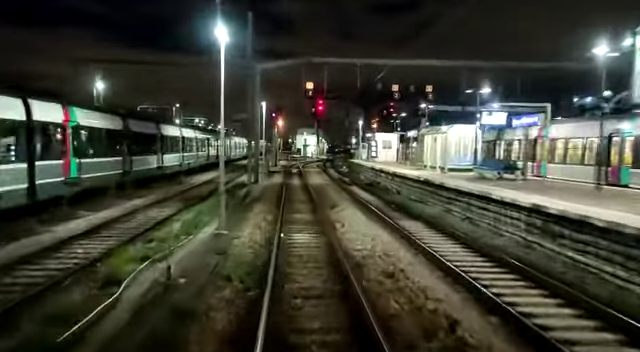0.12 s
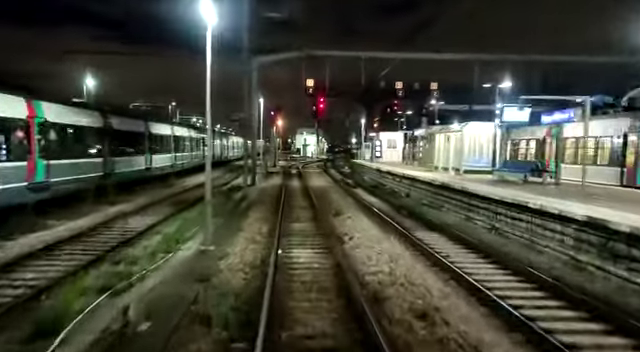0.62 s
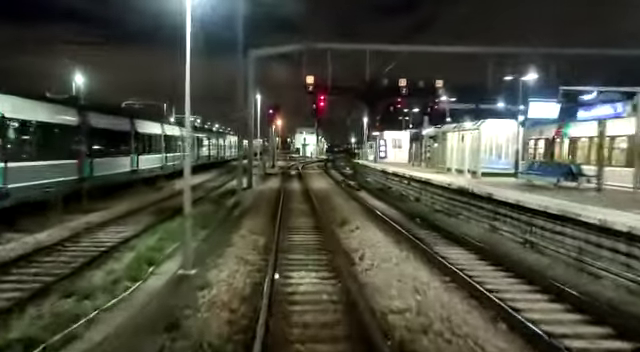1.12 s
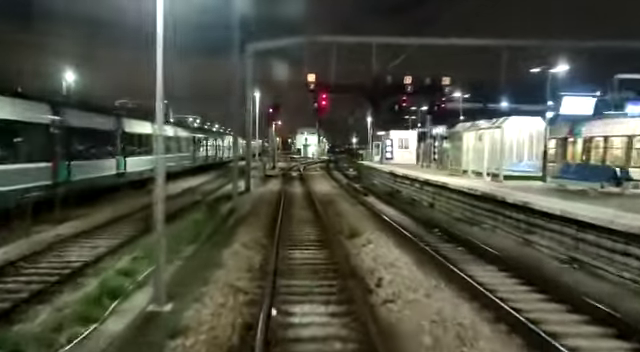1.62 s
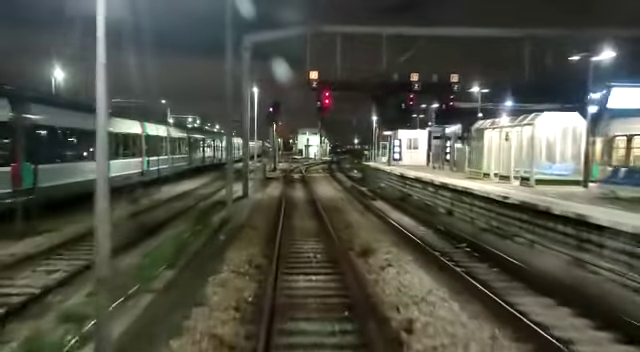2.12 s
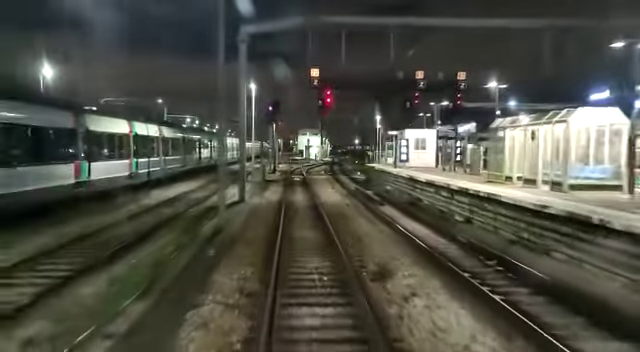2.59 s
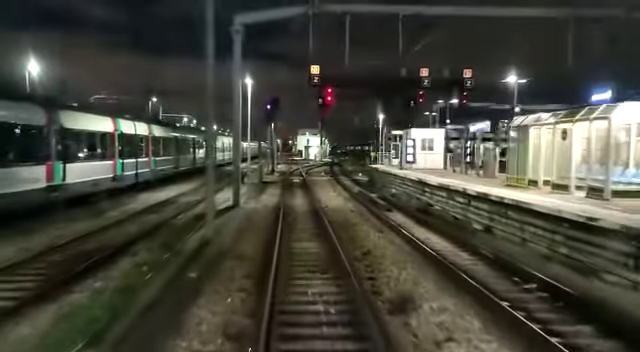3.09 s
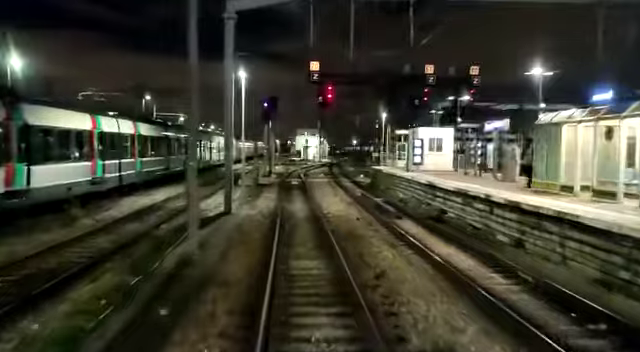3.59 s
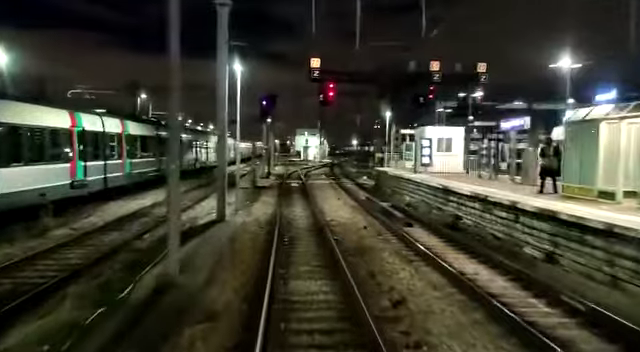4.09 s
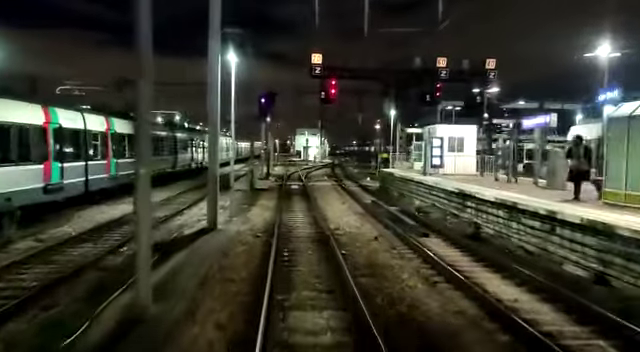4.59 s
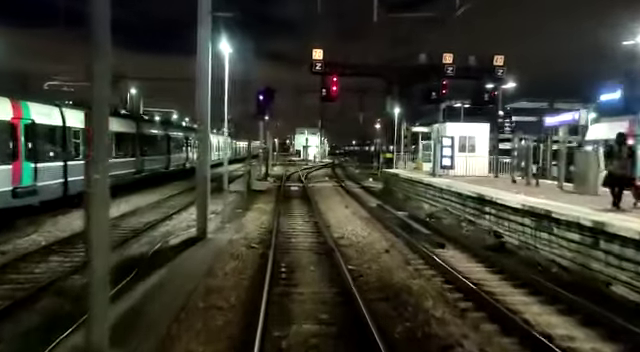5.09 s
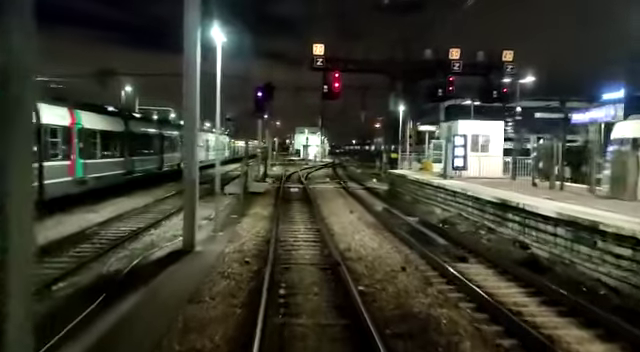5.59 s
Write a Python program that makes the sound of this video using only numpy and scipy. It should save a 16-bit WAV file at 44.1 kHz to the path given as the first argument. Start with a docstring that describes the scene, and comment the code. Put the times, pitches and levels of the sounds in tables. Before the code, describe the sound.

Inside an electric train cab rolling slowly: deep steady floor rumble, irregular dull wheel knocks over rail joints, short air-valve hisses and faint whine.

```python
"""A deep floor rumble and a knock of the wheels come first: we sit in the cab of an electric train
rolling slowly through a station at night. Rumble and air are coloured noise; knocks ring the floor's tones.
Air valves, small spits and rattles are short noise bursts; rubber squeaks are throbbing tones.
A fan hums and two power converters whine as wavering sines. The right microphone port is the brighter."""
import sys
import numpy as np
from scipy import signal
from scipy.fft import rfft, irfft, next_fast_len
from scipy.io import wavfile
from scipy.ndimage import uniform_filter1d

SR = 44100
rng = np.random.default_rng(int(sys.argv[2]) if len(sys.argv) > 2 else 0)


def wav_out(sig):
    """Save sig, one row per channel (or a flat mono array), as 16-bit PCM at SR to the path in sys.argv[1]."""
    wavfile.write(sys.argv[1], SR, np.round(np.clip(np.atleast_2d(sig).T, -1, 1) * 32767).astype(np.int16))


def decibels_to_gain(level_db):
    """Convert a level in decibels to a linear amplitude gain (20 dB per decade)."""
    exponent = np.asarray(level_db, float) / 20
    return 10 ** exponent


N = 251355  # length in samples, 5.7 s


def read(points, hz):
    """Reads a table of (frequency, value) between its points, on a log-frequency axis."""
    point_hz, value = np.transpose(points)
    return np.interp(np.log(hz + 1), np.log(point_hz + 1), value)


def along(rows):
    """Draws a level curve from (time, dB) points, one value per sample."""
    return np.interp(np.arange(N) / SR, *np.transpose(rows))


def add(mix, start_s, sound):
    """Mixes a stereo sound in at a given time, cutting off what runs past the end."""
    part = mix[:, max(round(start_s * SR), 0):][:, :sound.shape[1]]
    part += sound[:, :part.shape[1]]


def bump(hz, centre_hz, width_hz, peak_db):
    """A resonance lifts the frequencies around its centre; gives the lift in dB."""
    return peak_db / (1 + (2 * (hz - centre_hz) / width_hz) ** 2)


def split_db(hz, sign):
    """Gain in dB that keeps what lies above 4000 Hz (sign > 0) or below it (sign < 0); a small sign is gentler."""
    return -10 * np.log10(1 + ((hz + 1) / 4000) ** (-4 * sign))


def peaked(sound, level_db):
    """Sets the loudest 10 ms of the centre (mean of both ports) to the level of a sine that peaks at level_db."""
    loudest_power = uniform_filter1d(sound.mean(0) ** 2, SR // 100).max()
    return sound * decibels_to_gain(level_db) / np.sqrt(2 * loudest_power)


def slow(top_hz, channels):
    """Slow chance: 16 sines of random phase up to top_hz, the slower the stronger, scaled to rms 1."""
    hz = np.geomspace(top_hz / 20, top_hz, 16)[:, None]
    coarse_s = np.arange(0, N + 64, 64) / SR  # one point per 64 samples is enough
    curves = []
    for _ in range(channels):
        sines = np.sin(2 * np.pi * (hz * coarse_s + rng.random(hz.shape)))
        curve = (sines / np.sqrt(hz)).sum(0)
        curves.append(np.interp(np.arange(N) / SR, coarse_s, curve / curve.std()))
    return np.array(curves)


def diffuse(colour_db, size):
    """Noise that fills the cab: alike at both ports in the bass, nearly unrelated in the treble; centre rms 1."""
    # likeness of the two ports: pitch_hz, likeness (1 same, 0 unrelated, below 0 opposed)
    likeness = [(60, .99), (300, .95), (500, .75), (800, .5), (1200, -.1), (2500, -.2), (6000, -.05),
                (14000, .03)]
    # balance of the two ports: pitch_hz, left_over_right_db
    balance = [(60, -0.2), (700, 1.5), (1300, -7.5), (2200, -10), (3200, -5), (4700, -9), (6800, -8.5),
               (10500, -14.5), (12000, -9.5), (14000, -3.5)]
    hz = np.fft.rfftfreq(size, 1 / SR)
    a, b = rfft(rng.standard_normal((2, size)))
    same = np.clip(read(likeness, hz), -1, 1)
    side_gain = decibels_to_gain(read(balance, hz) / 2)
    left = a * side_gain
    right = (same * a + np.sqrt(1 - same ** 2) * b) / side_gain
    noise = irfft(np.array([left, right]) * decibels_to_gain(colour_db(hz)), size)
    return noise / noise.mean(0).std()


def patchy(sound, spread_db, bins, frames):
    """Patches of the spectrum, bins (86 Hz) by frames (2.9 ms) in size, swell and fade by chance."""
    spectrum = signal.stft(sound, nperseg=512, noverlap=384)[2]
    field = rng.standard_normal(spectrum.shape[1:])
    field = uniform_filter1d(uniform_filter1d(field, bins, 0), frames, 1)
    gain = decibels_to_gain(spread_db * field / field.std())
    return signal.istft(spectrum * gain, nperseg=512, noverlap=384)[1][:, :N]


def rolling():
    """Rough rail shakes the car body; air rushes in the vents and fizzes at the seals."""
    # spectrum of the rumble: pitch_hz, relative_level_db (per Hz)
    rumble_colour = [(8.8, 5), (15, -1.5), (38, 0), (65, -3), (109, -7.5), (199, -16), (243, -17.5),
                     (566, -32), (832, -36.5), (1200, -56), (1560, -44), (2640, -120)]
    # booms of the car body: pitch_hz, width_hz, lift_db
    booms = [(56.6, 3.8, -0.5), (104, 12, 5), (154, 77, 1.5), (252, 25, 4), (331, 42, 5.5)]
    # spectrum of the air: pitch_hz, relative_level_db (per Hz)
    air_colour = [(350, -23), (600, -8), (1100, -4.5), (1800, -7.5), (4000, -14), (5500, -22.5),
                  (7500, -23), (8200, -20), (8500, -113), (9400, -27), (10200, -36.5), (14400, -39)]
    # rumble as the track roughens and smooths: time_s, level_db
    rumble_curve = [(0.0, -34.5), (0.7, -35), (0.95, -32.5), (1.45, -32), (1.8, -35), (3.2, -36.5),
                    (3.6, -33), (4.2, -33.5), (4.55, -36), (4.75, -32.5), (5.7, -33.5)]
    # mid-band rush of air: time_s, level_db
    rush_curve = [(0.0, -56), (0.4, -59), (0.95, -60.5), (1.4, -55.5), (1.8, -59), (3.3, -60), (3.62, -56),
                  (3.9, -61), (5.7, -60)]
    # treble fizz of air: time_s, level_db
    fizz_curve = [(0.0, -63), (0.3, -67), (1.0, -65), (1.4, -65), (1.75, -67.5), (3.3, -66.5), (3.65, -64),
                  (3.95, -62), (4.15, -58), (4.55, -60.5), (4.8, -62.5), (5.0, -66), (5.3, -61.5),
                  (5.55, -67), (5.7, -65.5)]
    size = next_fast_len(N)
    rumble = diffuse(lambda hz: read(rumble_colour, hz) + sum(bump(hz, *boom) for boom in booms), size)
    rumble = patchy(rumble, spread_db=1.98, bins=3, frames=20)
    rush = diffuse(lambda hz: read(air_colour, hz) + split_db(hz, -1), size)[:, :N]
    fizz = diffuse(lambda hz: read(air_colour, hz) + split_db(hz, 1), size)[:, :N]
    air = decibels_to_gain(along(rush_curve)) * rush + decibels_to_gain(along(fizz_curve)) * fizz
    return decibels_to_gain(along(rumble_curve)) * rumble + patchy(air, spread_db=1.06, bins=30, frames=16)


def machine_tone(hz, level_db, lean_db, waver_db, drift_turns, waver_hz):
    """A steady machine tone; reflections make it waver differently at each port."""
    turns = hz * np.arange(N) / SR + drift_turns * slow(waver_hz, channels=2)
    sides_db = lean_db * np.array([[.5], [-.5]]) + waver_db * slow(waver_hz, channels=2)
    return np.sqrt(2) * decibels_to_gain(level_db + sides_db) * np.sin(2 * np.pi * turns)  # level_db is an rms level


def machines():
    """The fan's blade tone and the second and third harmonics of both converters' switching."""
    out = machine_tone(853.5, -63.5, lean_db=-.3, waver_db=2.6, drift_turns=.13, waver_hz=40)  # fan
    # converters: switching_hz, second harmonic level_db, third_over_second_db
    for switching_hz, level_db, third_db in ((3978.2, -65.5, -18), (4064.6, -64, -26)):
        out += machine_tone(2 * switching_hz, level_db,
                            lean_db=-1.2, waver_db=.9, drift_turns=.03, waver_hz=5)
        out += machine_tone(3 * switching_hz, level_db + third_db,
                            lean_db=-3.0, waver_db=2.5, drift_turns=.05, waver_hz=6)
    return out


def spits():
    """Small leaks let out thin, soft-edged bursts of mostly treble noise."""
    # leaks: start_s, peak_level_db
    leaks = [(0.106, -53.5), (0.191, -66), (1.02, -64), (2.804, -56), (3.503, -60.5), (3.653, -59),
             (3.774, -52.5)]
    # spectrum of a leak: pitch_hz, relative_level_db (per Hz)
    leak_colour = [(3500, -16), (5500, 11), (7500, 14.5), (9000, -1), (11500, 0), (14400, 12.5)]
    out, t = np.zeros((2, N)), np.arange(SR // 5) / SR
    rise_s, fade_s = .004, .032
    shape = (1 - np.exp(-t / rise_s)) * np.exp(-(t / fade_s) ** 2)
    for start_s, level_db in leaks:
        air = diffuse(lambda hz: read(leak_colour, hz), len(t))
        add(out, start_s, peaked(air * shape, level_db))
    return out


def squeaks():
    """Rubber sticks and slips on metal: brief throbbing tones from the right."""
    # squeaks: start_s, length_s, level_db (before the side balance), pitch_hz
    rubs = [(4.693, .07, -57, 3175), (5.068, .025, -60, 2650), (5.096, .086, -51, 2575),
            (5.2, .04, -61, 2600), (5.215, .05, -59, 2200)]
    slips_per_s, slip_depth = 48, .7
    grows_db, climb = 4, .007  # gain in level; pitch goes from 0.7 % below to 0.7 % above
    sides_db = np.array([[-2], [7]])  # left, right
    out = np.zeros((2, N))
    for start_s, length_s, level_db, pitch_hz in rubs:
        t = np.arange(int(length_s * SR)) / SR
        turns = np.cumsum(pitch_hz * (1 + climb * (2 * t / length_s - 1))) / SR
        wobble = .3 * np.sin(2 * np.pi * (30 * t + rng.random((2, 1))))  # in radians, 30 times a second
        tone = np.sin(2 * np.pi * (turns + rng.random((2, 1))) + wobble)
        slips = 1 - slip_depth * np.cos(np.pi * slips_per_s * t) ** 2
        swell = signal.windows.tukey(len(t), .3) * decibels_to_gain(grows_db * (t / length_s - 1))
        add(out, start_s, decibels_to_gain(level_db + sides_db) * tone * slips * swell)
    return out


def puffs_and_rattles():
    """Short bursts of hiss: the loud ones are air valves, the duller ones probably rattles after the knocks;
    each dies away in the cab, treble first."""
    # bursts of hiss, from loud valves or rattles: start_s, roar_peak_db, fizz_peak_db, hold_s
    # (peaks before the patches)
    bursts = [(0.474, -47, -50.5, 0.024), (0.825, -43, -35.5, 0.043), (1.137, -52, -67, 0.019),
              (1.233, -47.5, -60, 0.018), (1.308, -43, -73, 0.041), (1.396, -48, -76, 0.023),
              (1.581, -51.5, -71, 0.035), (2.802, -56, -60, 0.036), (4.496, -52.5, -58, 0.049),
              (4.688, -51.5, -67, 0.053), (5.063, -50, -58, 0.055), (5.315, -50, -66, 0.09)]
    # spectrum of the bursts: pitch_hz, relative_level_db (per Hz)
    burst_colour = [(300, -17), (500, 4.5), (1400, 6.5), (2700, 4), (4200, -9), (7700, -11.5),
                    (10600, -23.5), (11700, -34), (13200, -20), (14400, -46)]
    # resonances of the bursts: pitch_hz, width_hz, lift_db
    resonances = [(1375, 16, 6.5), (2170, 430, 0.5), (3400, 190, 5), (5270, 620, 8), (6480, 940, 7),
                  (10800, 1600, 9)]
    roar_t60_s, fizz_t60_s = .26, .21  # time to die away by 60 dB
    out, t = np.zeros((2, N)), np.arange(SR // 3) / SR

    def colour(hz):
        return read(burst_colour, hz) + sum(bump(hz, *mode) for mode in resonances)

    for start_s, roar_db, fizz_db, hold_s in bursts:
        rise_s = .13 * hold_s
        flutter = uniform_filter1d(rng.standard_normal(len(t)), 130)
        onset = (1 - np.exp(-t / rise_s)) * decibels_to_gain(1.5 * flutter / flutter.std())
        for sign, level_db, t60_s in ((-.79, roar_db, roar_t60_s), (.8, fizz_db, fizz_t60_s)):
            hiss = diffuse(lambda hz: colour(hz) + split_db(hz, sign), len(t))
            ring_out = decibels_to_gain(-60 * np.maximum(t - hold_s, 0) / t60_s)
            add(out, start_s - .003, peaked(hiss * onset * ring_out, level_db))
    return patchy(out, spread_db=3.0, bins=4, frames=14)  # uneven bands from the cab's reflections


def knocks():
    """Wheels cross rail joints: a rough contact rings the floor, and each blow lands elsewhere."""
    # blows: start_s, peak_level_db (floor tones from 200 Hz up), thump_over_peak_db (tones below 200 Hz)
    blows = [(0.009, -34.5, -0.5), (0.214, -44, 12), (0.845, -32, 3.5), (0.9, -39.5, 3), (1.117, -37, -2),
             (1.322, -28.5, -1), (2.786, -38, 1), (3.021, -37.5, 4), (3.239, -40.5, 12), (3.472, -39, -2),
             (3.53, -37, -13), (4.25, -43, 13), (4.655, -37, 7), (4.7, -34, 7), (4.868, -38, 2),
             (5.343, -32, 6.5), (5.452, -33.5, -11), (5.552, -31.5, -19)]
    # what the floor rings with: pitch_hz, relative_level_db, t60_s (time to die away by 60 dB)
    floor_modes = [(48.1, 16.5, 0.54), (99.4, 14, 0.83), (174, 11, 0.29), (252, 7.5, 0.052),
                   (308.5, 7.5, 0.09), (426.5, 7.5, 0.057), (509.7, -1, 0.13), (611, -9.5, 0.1),
                   (680.3, -2, 0.31), (826, -3.5, 0.26), (1060, -20, 0.16), (1200, -24, 0.24),
                   (1733, -8, 0.66), (2100, -12, 0.085)]
    out, t = np.zeros((2, N)), np.arange(SR // 3) / SR
    # every mode becomes three close neighbours
    hz, db, t60_s = np.repeat(np.transpose(floor_modes), 3, axis=1)[:, :, None]
    low = hz[:, 0] < 200
    rise_s, contact_s = .002, .062
    force = (1 - np.exp(-t / rise_s)) * np.exp(-(t / contact_s) ** 1.7)
    force *= 1 + .8 * np.exp(-t / .005)  # the first impact is the hardest
    for start_s, level_db, thump_db in blows:
        spread = 1 + .0407 * rng.standard_normal(hz.shape)
        rings = decibels_to_gain(db - 60 * t / t60_s) * np.sin(2 * np.pi * hz * spread * t) / np.sqrt(t60_s)
        push = diffuse(lambda f: 0 * f, len(t)) * force  # noise: the rough contact
        for part, part_db in ((low, thump_db), (~low, 0)):
            rung = signal.fftconvolve(push, rings[part].sum(0)[None], axes=1)
            add(out, start_s - .002, peaked(rung, level_db + part_db))
    return out


def scene():
    """All sources at the microphone ports."""
    return rolling() + machines() + spits() + squeaks() + puffs_and_rattles() + knocks()


def roll_off(x):
    """The treble ends steeply here."""
    return signal.sosfilt(signal.butter(12, 14540, fs=SR, output="sos"), x)


def record(dry):
    """The microphone's port resonance colours the scene, and its own hiss is added."""
    # port resonance: pitch_hz, width_hz, lift_db
    port = (6830, 320, 7)
    # spectrum of the microphone's own hiss: pitch_hz, relative_level_db (per Hz)
    hiss_colour = [(8500, -62), (9400, -21), (9800, -12.5), (11500, -3.5), (12200, 5.5), (14400, -3)]
    size = next_fast_len(N + 2048)
    port_gain = decibels_to_gain(bump(np.fft.rfftfreq(size, 1 / SR), *port))
    coloured = irfft(rfft(dry, size) * port_gain, size)
    own_hiss = decibels_to_gain(-75.5) * diffuse(lambda hz: read(hiss_colour, hz), size)
    mix = (coloured + own_hiss)[:, :N]
    return roll_off(mix)


dry = scene()
out = record(dry)
wav_out(out)
```